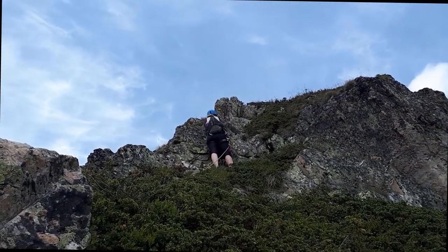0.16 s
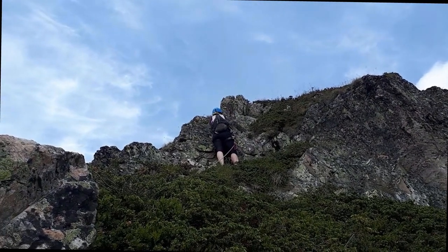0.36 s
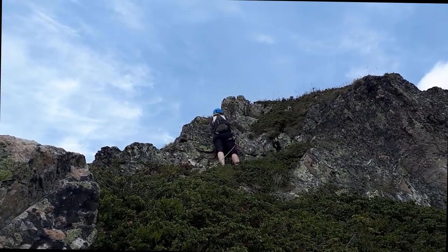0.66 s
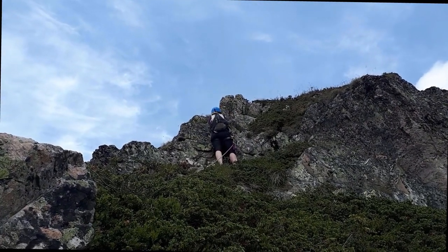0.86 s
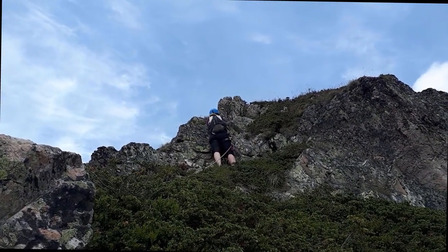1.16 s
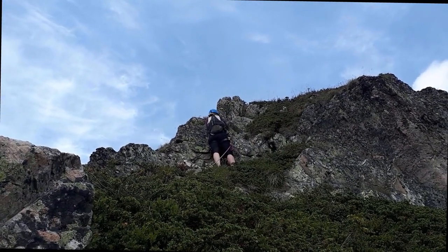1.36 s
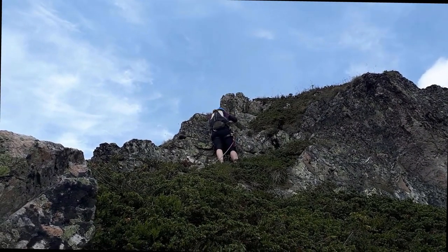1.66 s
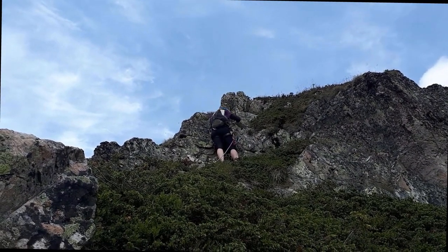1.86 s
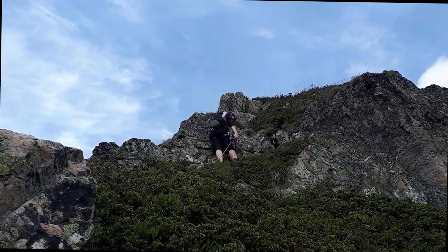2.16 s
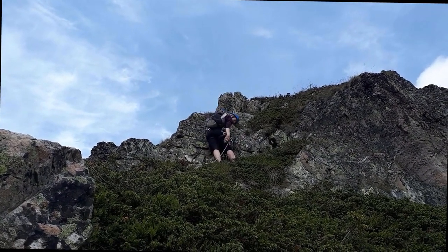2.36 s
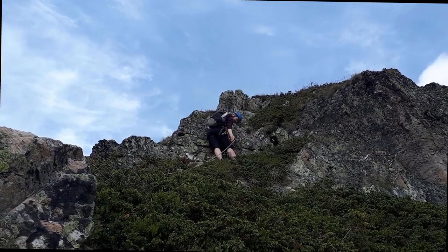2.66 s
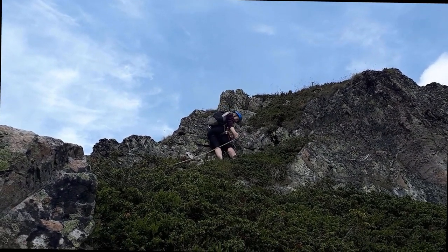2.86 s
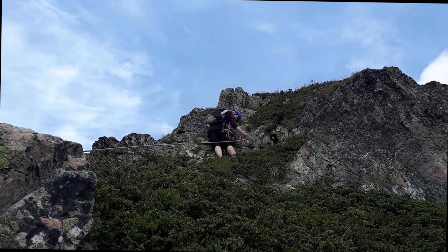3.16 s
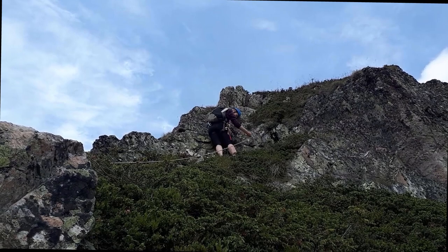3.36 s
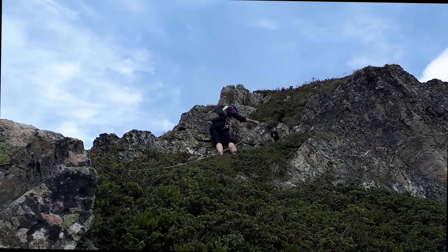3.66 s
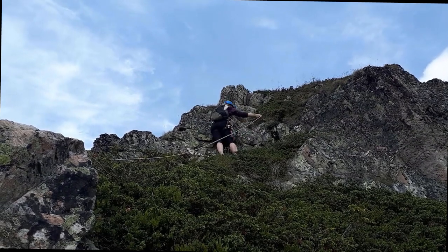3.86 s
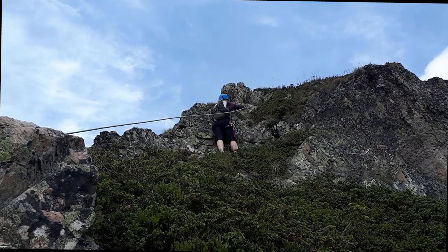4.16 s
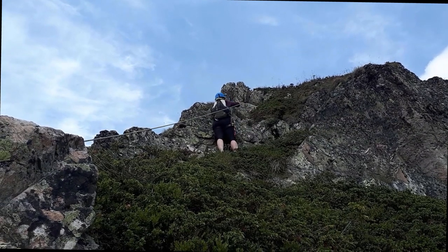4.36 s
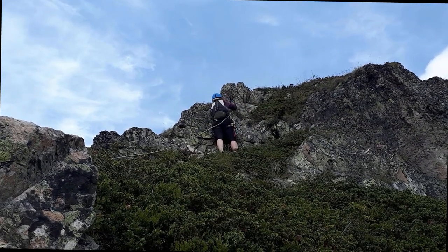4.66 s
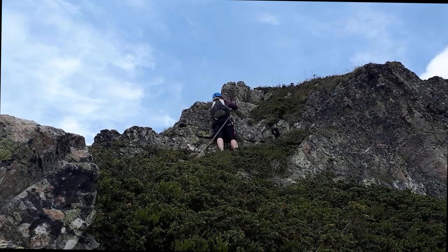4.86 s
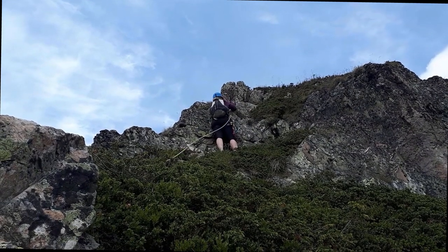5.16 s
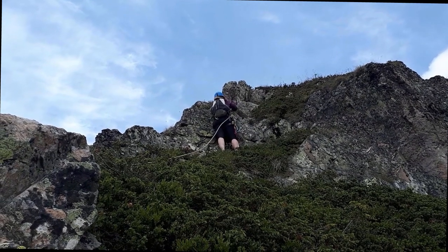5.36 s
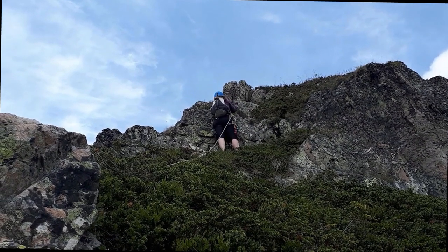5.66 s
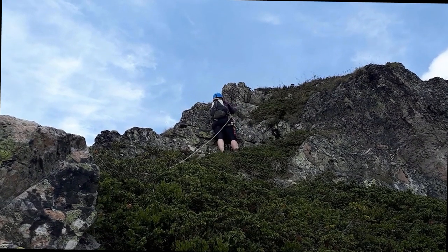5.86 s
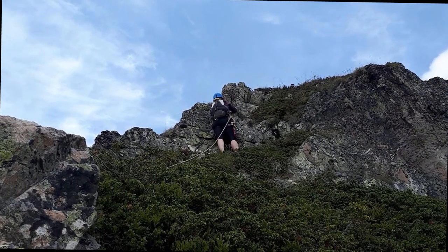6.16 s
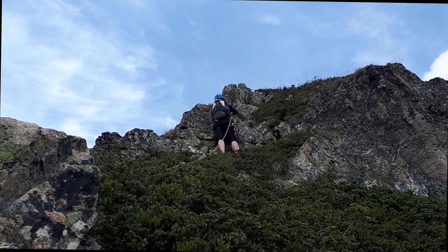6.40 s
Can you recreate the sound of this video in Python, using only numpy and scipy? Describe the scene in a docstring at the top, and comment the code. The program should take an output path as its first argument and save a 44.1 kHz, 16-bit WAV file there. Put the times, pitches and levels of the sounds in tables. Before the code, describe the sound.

A hard plastic click on the microphone housing opens. Close on the left, carabiners on a harness knock together in dry, short clinks, in scattered clusters. Low wind pops buffet each side separately, strongest on the right near one second. Cloth and rope rustle throughout; midway a rope drags with a grainy rasp and lighter clinks in front. Outdoors, no echo, handheld stereo microphone.

```python
"""Climbing gear on a windy ridge

Metal climbing gear knocks together on a harness beside a handheld stereo microphone.
Wind buffets each port as random pressure pops; cloth and rope rustle as patchy filtered noise.
Rope drags and webbing squeaks as noise in narrow resonances; a button snaps on the housing.
Carabiners on the left hip and a piece on the rope in front clink: noise rattle plus decaying modes."""
import sys
import numpy as np
from scipy import signal
from scipy.io import wavfile
from scipy.ndimage import uniform_filter1d

SR = 44100
rng = np.random.default_rng(int(sys.argv[2]) if len(sys.argv) > 2 else 0)


def wav_record(signal):
    """Record a signal, one row per channel, as 16-bit PCM in the file named by sys.argv[1]."""
    frames = np.transpose(np.atleast_2d(signal))
    bounded = np.clip(frames, -1, 1)
    # unit amplitude maps onto the largest positive 16-bit level
    quanta = np.round(bounded * 32767).astype(np.int16)
    wavfile.write(sys.argv[1], SR, quanta)


N = 287973


def gain_of(db):
    """dB to gain."""
    return 10 ** (np.asarray(db) / 20)


def evened(x):
    """Scales to rms 1."""
    return x / np.sqrt(np.mean(x ** 2) + 1e-20)


def steadied(x, power, size):
    """Evens out the short-time level of x in part, then scales to rms 1."""
    short_power = uniform_filter1d(x ** 2, size=size, axis=1)
    return evened(x / (short_power + 1e-20) ** power)


def read(points, hz):
    """Reads a spectrum on a log-frequency axis."""
    f, value = np.transpose(points)
    return np.interp(np.log(hz + 1), np.log(f + 1), value)


def curves(rows):
    """Columns of a table at every sample."""
    s, *columns = np.transpose(rows)
    return [np.interp(np.arange(N) / SR, s, c) for c in columns]


def colour(x, points, treble_db=0, low_db=0, ripple_db=0, size=4096):
    """Minimum-phase filter: a spectrum, shelves above 9 and below 4.5 kHz, optional ripple."""
    hz = abs(np.fft.fftfreq(size, 1 / SR)) + 1
    shelves_db = treble_db / (1 + (9000 / hz) ** 8) + low_db / (1 + (hz / 4500) ** 8)
    log_gain = np.log(gain_of(read(points, hz) + shelves_db + ripple_db))
    response = np.exp(np.conj(signal.hilbert(log_gain)))
    taps = np.fft.ifft(response).real[:size // 2]
    taps = taps.reshape((1,) * (x.ndim - 1) + (-1,))
    return signal.oaconvolve(x, taps, axes=-1)[..., :x.shape[-1]]


def wander(hz, count, order=1):
    """Slow random motion of rms 1: noise low-passed at hz."""
    low_pass = signal.butter(order, hz, fs=SR, output="sos")
    slow = signal.sosfilt(low_pass, rng.standard_normal((count, N)))
    return np.array([evened(v) for v in slow])


def add(mix, s, sound):
    """Mixes a sound in at s."""
    part = mix[:, max(round(s * SR), 0):][:, :sound.shape[1]]
    part += sound[:, :part.shape[1]]


# Hiss spectrum. Each row: frequency in Hz, relative density in dB per Hz.
AIR_SPECTRUM = [(290, -20.5), (500, -1.5), (710, -10.5), (1170, -16), (1480, -17.5), (4900, -27.5),
                (7380, -23.5), (8300, -28.5), (15100, -28), (15800, -24.5), (16500, -42)]
AIR_LEVEL_DB = -70.5


def air():
    """Distant steady hiss of the hillside and the microphone: coloured noise."""
    return gain_of(AIR_LEVEL_DB) * evened(colour(rng.standard_normal((2, N)), AIR_SPECTRUM))


# Breeze between gusts, before the lumps. Each row: time in seconds, left dB, right dB.
BREEZE = [(0, -50.5, -43.5), (.7, -45.5, -51.5), (1.2, -27.5, -33), (1.55, -49, -46), (2.0, -43.5, -42.5),
          (3.0, -38.5, -37.5), (3.5, -46.5, -42), (4.3, -45.5, -42.5), (5.0, -43.5, -47), (5.6, -51.5, -43),
          (6.53, -45, -48.5)]
# Gusts loud enough to thud. Each row: centre in seconds, port, peak level in dB, length in seconds.
GUSTS = [(0.049, "right", -24, 0.019), (0.124, "left", -39, 0.04), (0.128, "right", -32.5, 0.078),
         (0.22, "right", -25, 0.01), (0.534, "left", -34.5, 0.012), (0.868, "right", -18, 0.043),
         (0.912, "right", -17, 0.035), (0.972, "right", -12, 0.082), (1.034, "right", -20.5, 0.092),
         (1.053, "left", -25, 0.042), (1.28, "left", -20, 0.029), (1.394, "left", -29, 0.16),
         (1.705, "left", -28, 0.076), (1.825, "left", -26, 0.052), (1.945, "left", -30, 0.11),
         (1.955, "right", -19, 0.027), (2.334, "left", -37.5, 0.05), (2.384, "right", -25, 0.055),
         (2.683, "right", -20.5, 0.036), (2.723, "right", -26.5, 0.063), (2.863, "left", -40, 0.052),
         (2.884, "left", -23, 0.057), (2.987, "right", -23.5, 0.15), (3.05, "left", -28.5, 0.067),
         (3.236, "right", -27, 0.03), (3.423, "left", -35, 0.037), (3.517, "left", -26.5, 0.028),
         (3.731, "right", -27.5, 0.13), (3.857, "right", -23, 0.033), (3.88, "left", -31.5, 0.11),
         (4.133, "right", -31.5, 0.2), (4.177, "left", -29, 0.029), (4.27, "right", -32, 0.058),
         (4.39, "right", -34.5, 0.2), (4.51, "left", -28, 0.06), (4.662, "left", -25, 0.02),
         (4.707, "left", -28.5, 0.062), (4.83, "right", -19.5, 0.1), (5.194, "right", -27.5, 0.057),
         (5.582, "right", -28, 0.046), (5.65, "left", -33, 0.13), (5.8, "right", -28, 0.036)]
# Soft pressure pop. Each row: frequency in Hz, relative density in dB per Hz.
SOFT_POP_SPECTRUM = [(12, -52.5), (20, -29.5), (89, 3), (150, 1), (259, -7), (399, -21), (439, -23),
                     (615, -44), (1060, -73), (1800, -55), (2340, -74.5), (3960, -120)]
# Sharp pressure pop in strong gusts. Each row: frequency in Hz, relative density in dB per Hz.
SHARP_POP_SPECTRUM = [(12, -57), (20, -40), (113, 3.5), (210, 2.5), (343, -1), (689, -21), (1100, -42),
                      (1500, -55.5), (2200, -98)]
LUMPS_RMS_DB, LUMPS_HZ = 5.0, 7.5  # small puffs make the breeze lumpy
POPS_PER_S, PUSH_SHARE = 190, 0.7
SHARP_GAIN = 0.14  # wind gain at which all pops are sharp


def wind():
    """Eddies pop on each port, mostly as pushes; strong gusts give shorter, sharper pops."""
    t = np.arange(N) / SR
    lumps_db = LUMPS_RMS_DB * wander(LUMPS_HZ, count=2, order=2)
    power = gain_of(curves(BREEZE) + lumps_db) ** 2
    for s, port, db, length_s in GUSTS:
        side = int(port == "right")
        fall_db = 11.1 * abs(2 * (t - s) / length_s) ** 2.85
        power[side] = np.maximum(power[side], gain_of(2 * db - fall_db))
    gain = np.sqrt(power)

    strength = gain_of(3.13 * np.minimum(rng.exponential(1, (2, N)), 3))
    pops = strength * (rng.random((2, N)) < POPS_PER_S / SR)
    pops *= np.where(rng.random((2, N)) < PUSH_SHARE, 1, -1)
    pops = evened(pops) + 0.24 * rng.standard_normal((2, N))
    # steadied, so that the gust sets the strength of its pops
    soft = steadied(colour(pops, SOFT_POP_SPECTRUM), 0.3, size=2000)
    sharp = steadied(colour(pops, SHARP_POP_SPECTRUM), 0.4, size=900)
    share = np.clip(gain / SHARP_GAIN, 0, 1) ** 1.58
    return gain * (np.sqrt(1 - share ** 2) * soft + share * sharp)


SHAKE_DB, SHAKE_TOP_DB = -28.5, -63  # webbing hiss relative to the knock, ceiling
SHAKE_FADE_S = 0.056  # time constant of its power


def shaking():
    """Power of the webbing hiss that each knock sets off, fading exponentially."""
    kicks = np.zeros(N)
    for s, gear, db, *_ in CLINKS:
        kicks[round(s * SR)] = gain_of(2 * min(db + SHAKE_DB, SHAKE_TOP_DB))
    return signal.lfilter([1], [1, -np.exp(-1 / (SHAKE_FADE_S * SR))], kicks)


PATCH_RMS_DB = 3.0  # fibres of other sizes catch at other moments


def patchy(x):
    """Lets small areas of time and pitch swell and fade by chance."""
    z = signal.stft(x, nperseg=256)[2]
    patches = rng.standard_normal(z.shape[:0:-1]).T
    patches = uniform_filter1d(patches, size=7, axis=0)
    patches = evened(uniform_filter1d(patches, size=12, axis=1))
    return signal.istft(z * gain_of(PATCH_RMS_DB * patches), nperseg=256)[1][:, :N]


# Cloth and rope rubbing, before patches and treble trim.
# Each row: time in seconds, left level in dB, left minus right in dB.
RUBBING = [(0, -69.5, 37), (.33, -64.5, 22.5), (.42, -76.5, 29), (.68, -82, 22), (.78, -65, 17),
           (1.13, -72, 11), (1.47, -70, 10), (1.56, -64.5, 10), (1.68, -68.5, 16), (1.9, -62.5, 7),
           (2.06, -70, 11), (2.13, -61, 16), (2.25, -65.5, 1.5), (2.9, -63.5, 9.5), (3.15, -67.5, 4),
           (3.39, -55, 13), (3.54, -63.5, 7), (3.62, -60.5, 3), (3.73, -61, 9), (3.95, -69.5, 6),
           (4.18, -57, 7.5), (4.29, -76, 12), (4.36, -59, 7), (4.47, -62.5, 8), (4.65, -73.5, 4),
           (4.9, -57.5, 5.5), (5.24, -72.5, 10), (5.76, -74.5, 7), (5.86, -79, 24.5), (6.53, -82.5, 14)]
# Hiss of the fibres. Each row: frequency in Hz, relative density in dB per Hz.
CLOTH_SPECTRUM = [(530, -37), (900, -8.5), (1430, -15), (2030, -8), (3470, -9), (4220, -11), (6950, 1.5),
                  (7660, 1), (8550, -23), (9430, -15.5), (15300, -4.5), (15900, -15), (16500, -21.5)]
RUSTLE_TREBLE_DB, RUSTLE_TREBLE_HZ = -3.5, 8800
CRACKLES_PER_S = 300
RUSTLE_SHARED = 0.55  # correlation of the noise at the two ports


def rustle():
    """Fibres scrape as a flickering hiss with fine crackle, partly shared by the ports."""
    left_db, pan_db = curves(RUBBING)
    level = np.sqrt(gain_of(2 * left_db) + shaking())
    a, b = rng.standard_normal((2, N)) * gain_of(2 * wander(35, count=1))
    crackle = gain_of(1.9 * np.minimum(rng.exponential(1, N), 4))
    a += 2.2 * crackle * (rng.random(N) < CRACKLES_PER_S / SR)
    left = evened(colour(a, CLOTH_SPECTRUM, low_db=2.0))
    mixed = RUSTLE_SHARED * np.roll(a, 9) + np.sqrt(1 - RUSTLE_SHARED ** 2) * b  # 9 samples late
    right = evened(colour(mixed, CLOTH_SPECTRUM, treble_db=0.5))
    hiss = patchy(np.array([left, right]))
    high_pass = signal.butter(4, RUSTLE_TREBLE_HZ, "high", fs=SR, output="sos")
    treble = signal.sosfilt(high_pass, hiss)
    trimmed = hiss + (gain_of(RUSTLE_TREBLE_DB) - 1) * treble
    return level * gain_of([0 * pan_db, -pan_db]) * trimmed


DRAG_START_S, DRAG_LENGTH_S = 3.2, 0.5
DRAG_DB, DRAG_LEFT_DB, DRAG_RIGHT_DB = -74, -4.0, 3.0  # level, then offset at each port
DRAG_RISE_DB_PER_S, DRAG_FALL_DB_PER_S = 90, 50
DRAG_HZ, DRAG_SAG_HZ, DRAG_WAVER_RMS_HZ = 2180, 270, 45  # the pitch sags near the middle of the pull


def drag():
    """Rope sheath on rock, stronger on the right: grainy noise in one wavering resonance."""
    t = np.arange(N) / SR - DRAG_START_S
    rise_db = DRAG_RISE_DB_PER_S * np.minimum(t, 0)
    fall_db = DRAG_FALL_DB_PER_S * np.maximum(t - DRAG_LENGTH_S, 0)
    sag_hz = DRAG_SAG_HZ * np.exp(-(4 * t / DRAG_LENGTH_S - 2.4) ** 2 / 2)
    noise = rng.standard_normal(N) * gain_of(3.0 * wander(20, count=1)[0])
    pitch_hz = DRAG_HZ - sag_hz + DRAG_WAVER_RMS_HZ * wander(3.3, count=1)[0]
    turn = np.exp(2j * np.pi * np.cumsum(pitch_hz) / SR)
    # shift the pitch to 0 Hz, low-pass, shift back
    low_pass = signal.butter(2, 170, fs=SR, output="sos")
    band = evened((turn * signal.sosfilt(low_pass, noise / turn)).real)
    ports = gain_of([[DRAG_LEFT_DB], [DRAG_RIGHT_DB]])
    return gain_of(DRAG_DB + rise_db - fall_db) * ports * band


# Short squeaks and scrapes of metal on webbing, level before fades and port offsets.
# Each row: centre in seconds, half length in seconds, level in dB, pitch in Hz, width in Hz,
# step per overtone in dB.
SCRAPES = [(0.322, 0.045, -62.5, 2920, 700, -16), (1.551, 0.04, -58.5, 683, 60, -27),
           (1.576, .08, -78, 2030, 150, -14), (2.636, 0.056, -63.5, 675, 149, -33),
           (2.825, 0.031, -61, 1135, 484, -33), (5.205, 0.039, -78, 3000, 150, -35.5)]


def scrape(s, half_s, db, hz, width_hz, overtone_db):
    """Friction noise in a narrow resonance and its multiples."""
    noise = rng.standard_normal((2, round(2 * half_s * SR)))
    tone = 0
    for k in range(3):
        multiple_hz = hz * (k + 1)
        peak = signal.iirpeak(multiple_hz, multiple_hz / width_hz, SR)
        tone = tone + gain_of(overtone_db * k) * signal.lfilter(*peak, noise)
    ports = gain_of([[3.0], [-1.5]])
    return s - half_s, gain_of(db) * ports * evened(tone) * np.hanning(tone.shape[1])


# Button. One row: start in seconds, left level in dB, left minus right in dB.
SNAP = (.0068, -9.5, 14)
# Housing modes. Each row: frequency in Hz, relative level in dB, t60 in seconds.
HOUSING_MODES = [(1200, -24, 0.014), (3425, 0.5, 0.0027), (4830, 2.5, 0.0017), (7300, -3.5, 0.0033),
                 (15000, -13, .002)]


def snap():
    """The button clicks the plastic housing, which rattles for a moment."""
    s, db, pan_db = SNAP
    t = np.arange(round(SR / 20)) / SR
    ring = sum(gain_of(level_db - 60 * t / t60_s) * np.sin(2 * np.pi * hz * t)
               for hz, level_db, t60_s in HOUSING_MODES)
    noise = uniform_filter1d(rng.standard_normal(len(t)), size=3)
    rattle = gain_of(-25.5 - 60 * (t / 0.012) ** 2) * noise
    return s, gain_of([[db], [db - pan_db]]) * (ring + rattle)


# Carabiner modes in four groups: large low, small low, middle, high.
# Each row: frequency in Hz, relative level in dB, t60 in seconds.
HIP_MODES = [
    [(2880, 0, .07), (2990, -4, .04)],
    [(3634, 0, .09), (3500, -3, .05)],
    [(6065, 0, .11), (7240, -12, .08)],
    [(9776, 0, .08), (11300, -12, .04), (12810, -8, .05), (14790, -14, .07)],
]
# Modes of the piece on the rope in four groups, low to high.
# Each row: frequency in Hz, relative level in dB, t60 in seconds.
FRONT_MODES = [
    [(6778, 0, .4), (7267, -9, .12)],
    [(8839, 2, .14), (9582, -9, .3)],
    [(12520, -10, .08), (12860, 0, .15)],
    [(13840, 0, .07), (15100, -5, .05)],
]
# Position on the hip. One row: left minus right in dB, ring at the far port in dB before shading.
HIP_SIDE = (12.5, -1.78)
# Position on the rope. One row: left minus right in dB, ring at the far port in dB before shading.
ROPE_SIDE = (2.3, 18.7)
LARGE_LOW, SMALL_LOW, HIP_MIDDLE, HIP_HIGH = HIP_MODES
ROPE_MODES = [FRONT_MODES[0], FRONT_MODES[1] + FRONT_MODES[2], FRONT_MODES[3]]
PIECES = {"large": ([LARGE_LOW, HIP_MIDDLE, HIP_HIGH], *HIP_SIDE),
          "small": ([SMALL_LOW, HIP_MIDDLE, HIP_HIGH], *HIP_SIDE),
          "rope": (ROPE_MODES, *ROPE_SIDE)}
# Knock noise before shelves. Each row: frequency in Hz, relative density in dB per Hz.
KNOCK_SPECTRUM = [(410, -63), (700, -35), (1730, -30.5), (2680, -13.5), (2900, -16.5), (3230, -15.5),
                  (4440, -14), (5650, -11), (6120, -7.5), (6800, -6), (7470, -0.5), (8870, -23),
                  (9610, -11), (15300, -12.5), (16800, -39.5)]
# Shadow of the housing, scaled by pan / 13 dB. Each row: frequency in Hz, left minus right in dB.
SHADE = [(60, 6.5), (130, 12.0), (290, 13.5), (640, 8.5), (1410, -9.5), (3100, 13.5), (6820, 13),
         (15000, 18.5)]
# Clinks, shelves relative to the bases below. Each row: time in seconds, piece, knock level in dB,
# treble shelf in dB, low shelf in dB, ring of the low, middle and high modes in dB.
CLINKS = [(.242, "small", -46, -16, -15, -52, -74, -71), (0.93, "small", -38.5, -3.5, -15.5, -55, -56, -62),
          (0.983, "small", -21, 3.5, -11, -72, -56, -48), (1.02, "small", -46, -12, -8, -81, -76, -69),
          (1.053, "small", -55, -18, -11, -76, -81, -87),
          (1.162, "large", -43.5, -9, -14, -44.5, -42.5, -39.5),
          (1.256, "small", -42, -7, -5.5, -84, -84, -74), (1.536, "large", -50, -13, -16, -85, -75, -51),
          (1.791, "small", -40, -7, -22, -83, -71, -53), (1.855, "small", -55, -5, -29, -81, -77, -73),
          (1.919, "small", -48, -16, 3, -77, -54, -67), (2.143, "large", -58.5, -3, -13, -57.5, -72, -60),
          (2.272, "small", -53, -21, -17, -78, -59, -72), (2.303, "small", -51.5, -12, -13, -80, -53, -56),
          (2.353, "large", -53.5, -12.5, -23, -69, -60, -73),
          (2.371, "large", -38.5, 4.5, -10.5, -62, -69, -38),
          (2.412, "large", -49.5, -13, -6, -60, -68, -72), (2.482, "small", -20, -8.5, -17, -70, -59, -53),
          (2.533, "small", -29, 0, -10.5, -45, -59, -24.5), (2.687, "small", -31, 5, -13, -44, -45, -28),
          (2.712, "small", -34, -3, -13.5, -45.5, -35.5, -34),
          (2.88, "large", -34, -4.5, -24, -47, -37, -34),
          (2.897, "large", -39.5, -3, -10.5, -40.5, -54, -59),
          (2.966, "small", -57, -13, -12, -80, -80, -73), (3.001, "large", -54, -33, -40, -71, -70, -71),
          (3.043, "large", -51, -19, -21, -45, -52, -51.5), (3.209, "rope", -44, -18, -16.5, -93, -85, -90),
          (3.342, "large", -42, -2, -10.5, -71, -67, -48), (3.367, "rope", -40.5, -13, -16, -55, -60, -62),
          (3.395, "rope", -41.5, -11, -9, -75, -68, -75), (3.505, "rope", -56, 12, -21, -78, -85, -68),
          (3.703, "rope", -33.5, -2.5, -18, -67, -82, -46), (3.805, "rope", -46, -12, -23, -85, -91, -68),
          (4.005, "small", -46, -7, -19, -54, -62, -57), (4.73, "small", -24, -7, -16, -46, -50, -27),
          (4.778, "small", -29, 2, -10, -45, -40, -64), (4.851, "large", -27.5, 3, -12, -46, -51, -27),
          (4.873, "small", -33, 0, -12.5, -65, -62, -54), (4.96, "small", -56, 12, -12, -58, -74, -55),
          (4.979, "large", -62, -10, -7.5, -56, -69, -52), (5.012, "large", -26, -4, -16, -59, -58, -45),
          (5.08, "small", -39, 4, -11.5, -57, -60, -46), (5.102, "small", -42.5, -10, -10.5, -51, -77, -68),
          (5.265, "large", -56, -36, 34, -84, -92, -74), (5.419, "large", -37, 3, -12.5, -49, -72, -45),
          (5.549, "large", -42, -17, -13, -47, -58, -51),
          (5.664, "large", -47, -12.5, -14.5, -45.5, -79, -47.5),
          (5.758, "small", -59, -14, -9, -82.5, -71.5, -74), (5.964, "large", -65, -9, 5, -54, -81, -67),
          (6.171, "large", -53.5, -22.5, -19.5, -60.5, -73.5, -61.5)]
KNOCK_TRIM_DB, TREBLE_BASE_DB, LOW_BASE_DB = 0.1, 2.0, 12.5
RIPPLE_RMS_DB = 3.83  # each contact excites other damped parts
RING_SCATTER_RMS_DB = 3  # each blow lands elsewhere on the metal
KNOCK_SHARED = 0.6  # the far port hears the contacts by another path


def clink(s, gear, db, treble_db, low_db, *groups_db):
    """A rattle of contacts among damped parts, a scatter off body and rock, and the metal's ring."""
    modes, pan_db, far_ring_db = PIECES[gear]
    t = np.arange(round(SR / 3)) / SR
    noise, other, left, right = rng.standard_normal((4, len(t)))

    envelope = t / 0.0022 * np.exp(-t / 0.0023) + 0.0597 * np.exp(-(t / 0.021) ** 2)
    jitter = uniform_filter1d(noise[::-1], size=30) * np.sqrt(30)
    rattle = envelope * gain_of(2.4 * jitter)
    scatter = gain_of(-28.5 - 60 * t / 0.14) * (1 - np.exp(-t / 0.0066))
    bumps = evened(uniform_filter1d(rng.standard_normal(257), size=5))
    ripple_db = RIPPLE_RMS_DB * np.r_[bumps, bumps[-2:0:-1]]  # mirrored for negative frequencies
    parts = np.array([noise * rattle, other * rattle, left * scatter, right * scatter])
    parts = colour(parts, KNOCK_SPECTRUM, treble_db + TREBLE_BASE_DB, low_db + LOW_BASE_DB,
                   ripple_db, size=512)
    onset_rms = np.sqrt(np.mean(parts[0, :360] ** 2))
    knock, turned, left_tail, right_tail = parts * gain_of(db + KNOCK_TRIM_DB) / onset_rms

    ring = np.zeros(len(t))
    for group_db, group in zip(groups_db, modes):
        for hz, level_db, t60_s in group:
            mode_db = group_db + level_db + RING_SCATTER_RMS_DB * rng.standard_normal()
            ring += gain_of(mode_db - 60 * t / t60_s) * np.sin(2 * np.pi * (hz * t + rng.random()))
    ring *= 1 - np.exp(-(t / 0.0031) ** 2)  # rings freely once the parts separate

    far = KNOCK_SHARED * knock + np.sqrt(1 - KNOCK_SHARED ** 2) * turned
    far = far + gain_of(far_ring_db) * ring
    shadow = [(hz, -shade_db * pan_db / 13) for hz, shade_db in SHADE]
    far = colour(far, shadow, size=128)
    far = np.roll(far, round(pan_db * SR / 40000))  # the way round the housing is longer
    far = far + gain_of(-0.6 * pan_db) * right_tail
    return s - 0.0015, np.array([knock + ring + left_tail, far])


def scene():
    """Wind, rubbing and gear together."""
    mix = air() + wind() + rustle() + drag()
    for row in SCRAPES:
        add(mix, *scrape(*row))
    add(mix, *snap())
    for row in CLINKS:
        add(mix, *clink(*row))
    return mix


EDGE_HZ = 16900


def record(dry):
    """Band limit of the recorder: a steep low-pass."""
    taps = signal.firwin(511, EDGE_HZ, window=("kaiser", 9), fs=SR)
    return signal.oaconvolve(dry, taps[None], "same")


dry = scene()
out = record(dry)
wav_record(out)
```